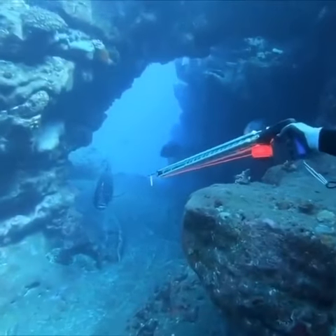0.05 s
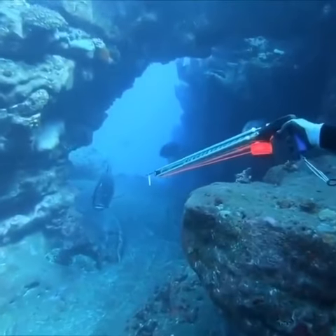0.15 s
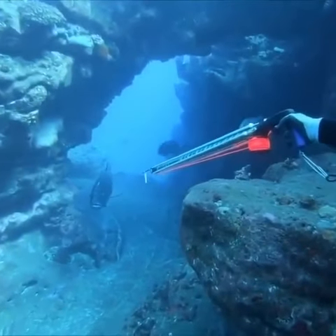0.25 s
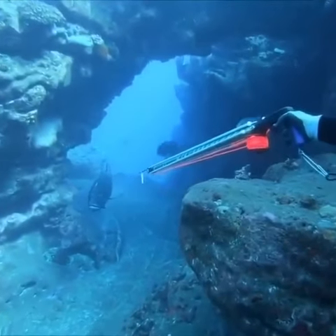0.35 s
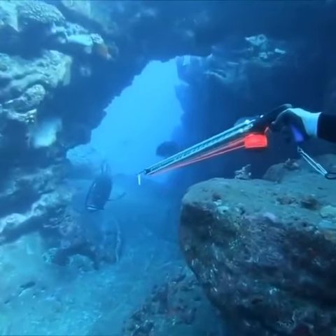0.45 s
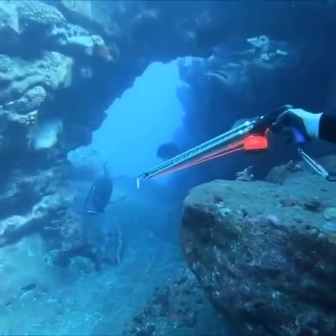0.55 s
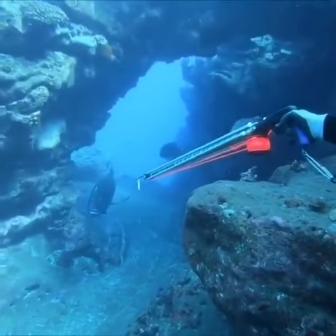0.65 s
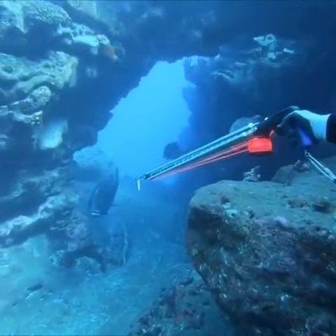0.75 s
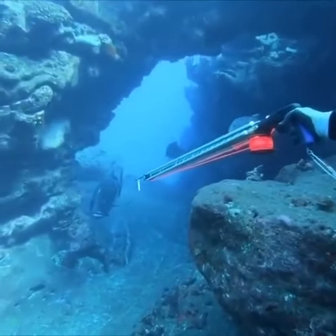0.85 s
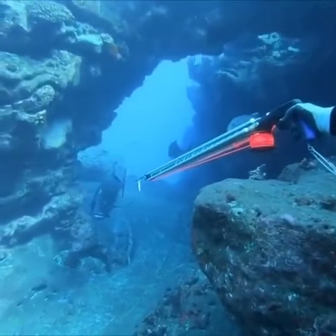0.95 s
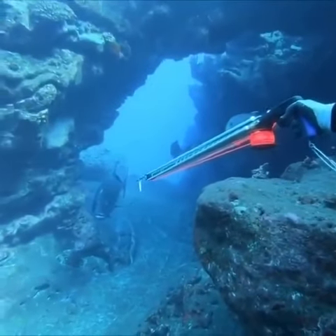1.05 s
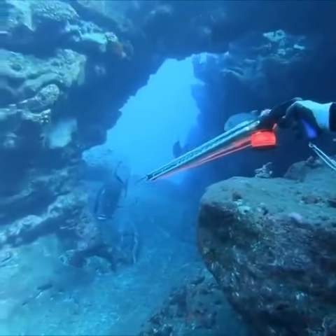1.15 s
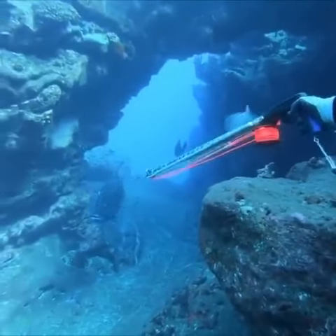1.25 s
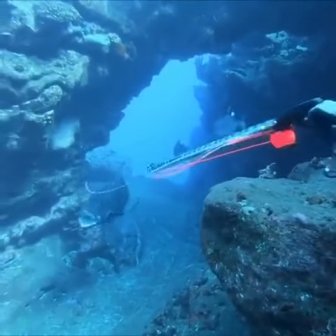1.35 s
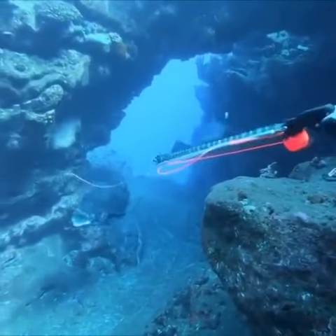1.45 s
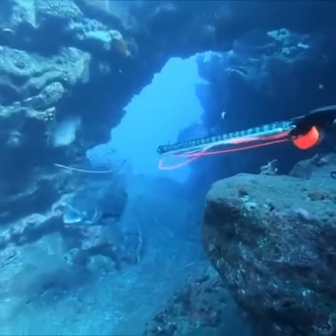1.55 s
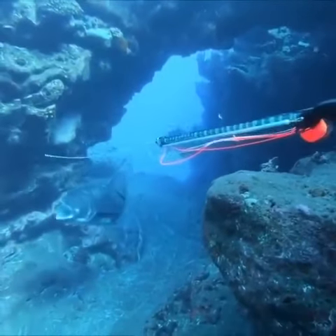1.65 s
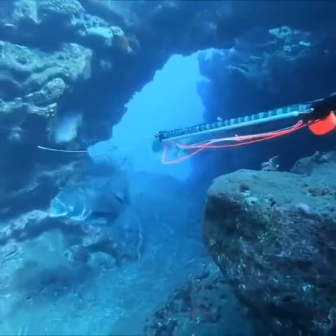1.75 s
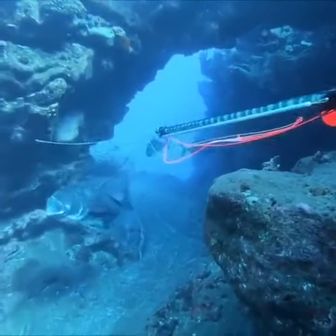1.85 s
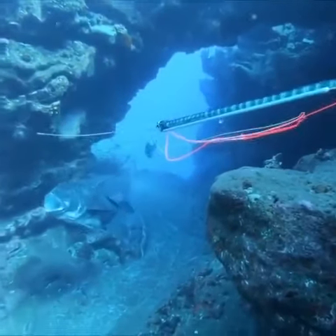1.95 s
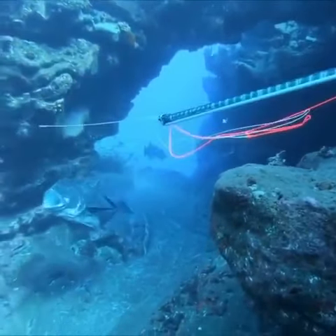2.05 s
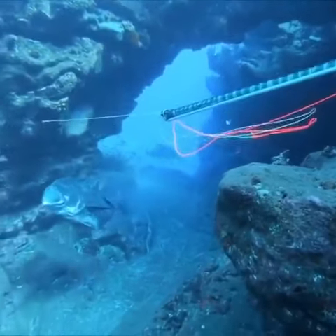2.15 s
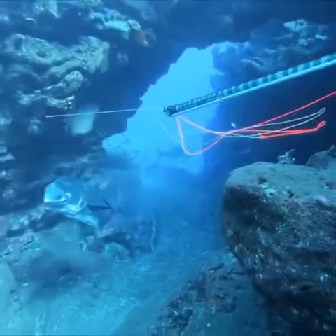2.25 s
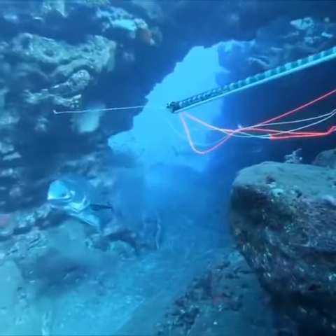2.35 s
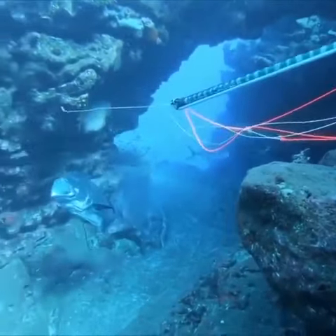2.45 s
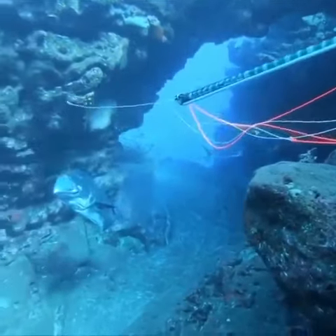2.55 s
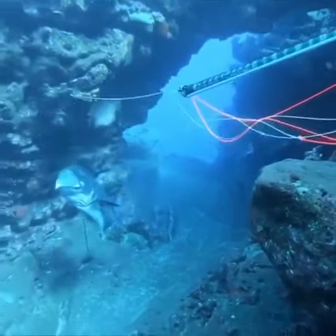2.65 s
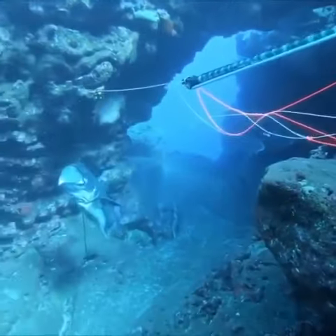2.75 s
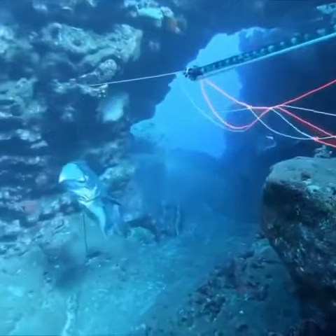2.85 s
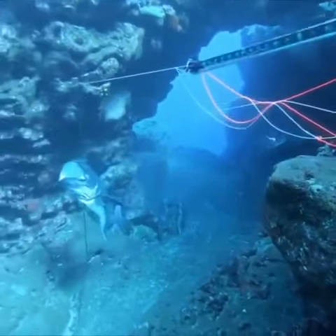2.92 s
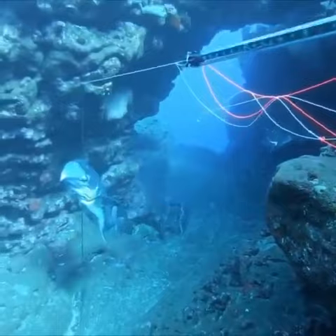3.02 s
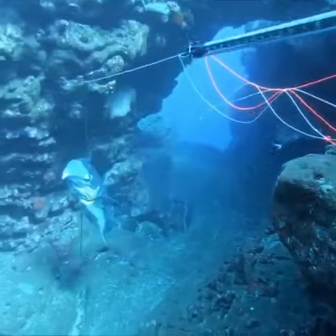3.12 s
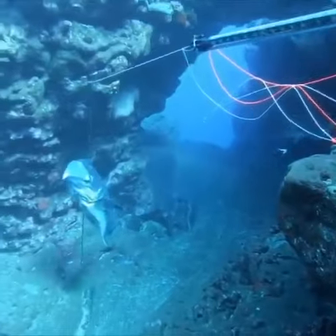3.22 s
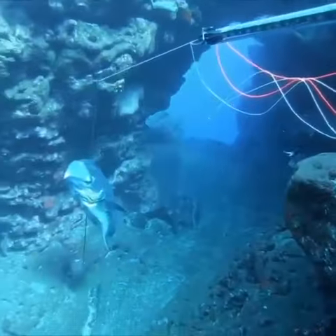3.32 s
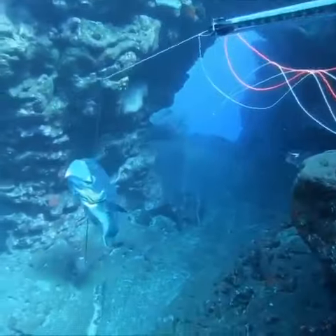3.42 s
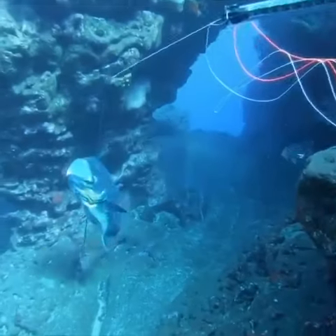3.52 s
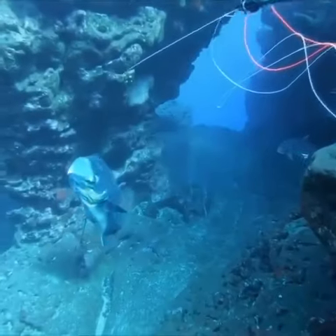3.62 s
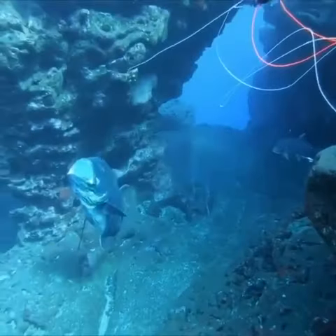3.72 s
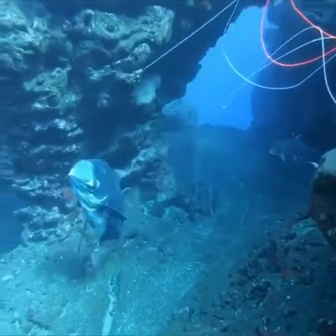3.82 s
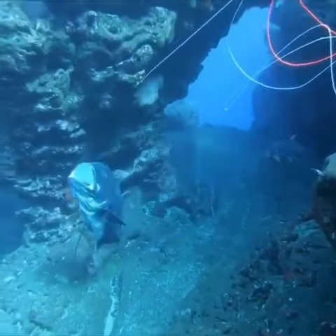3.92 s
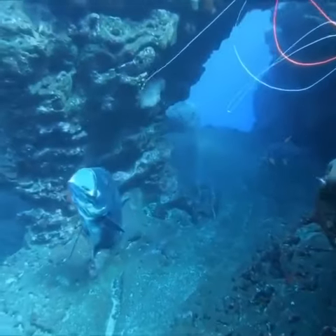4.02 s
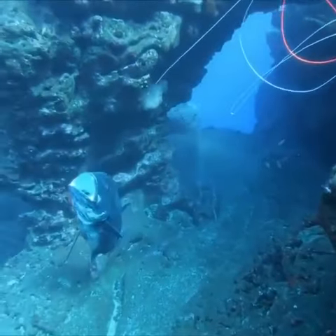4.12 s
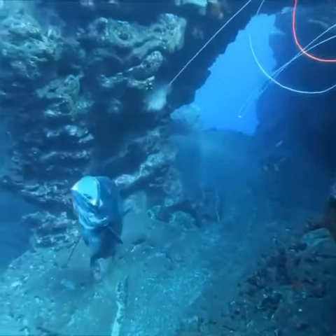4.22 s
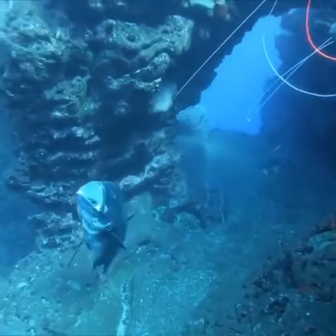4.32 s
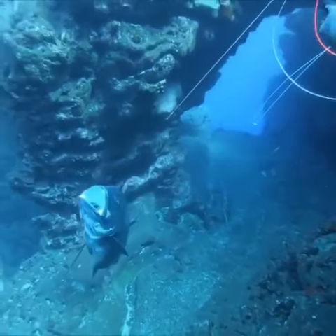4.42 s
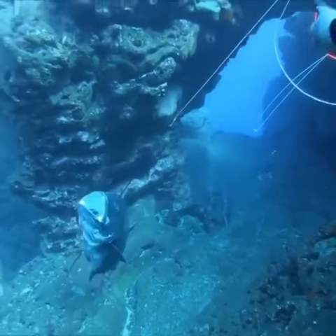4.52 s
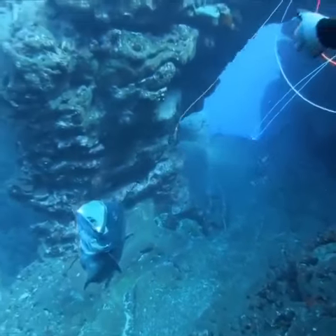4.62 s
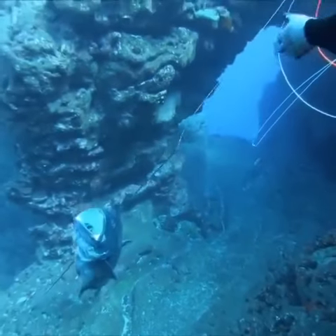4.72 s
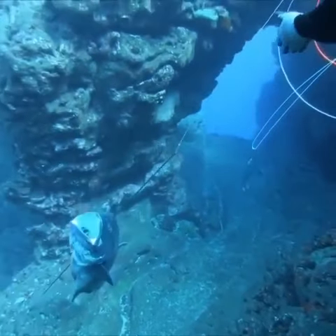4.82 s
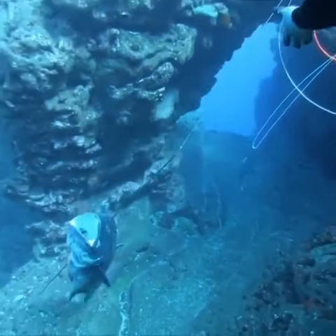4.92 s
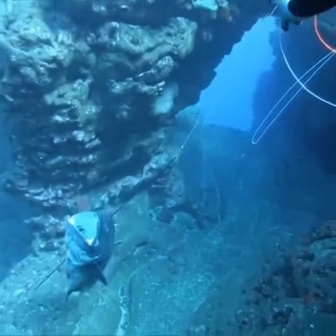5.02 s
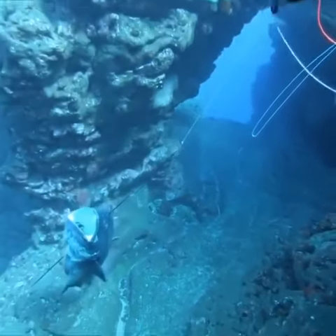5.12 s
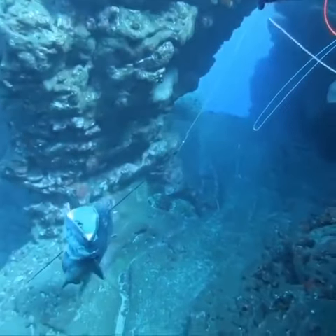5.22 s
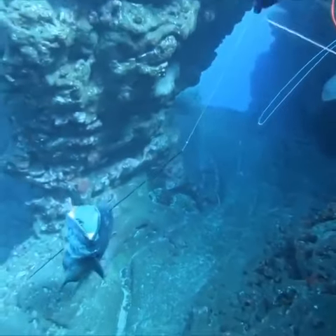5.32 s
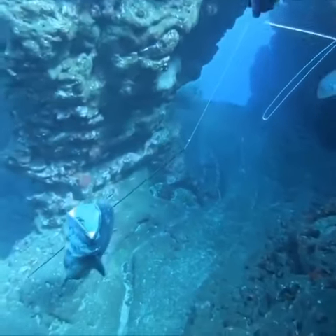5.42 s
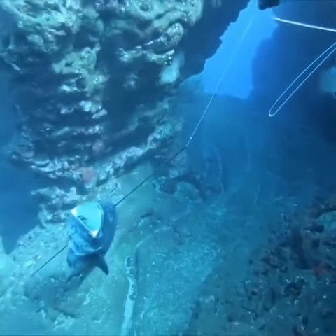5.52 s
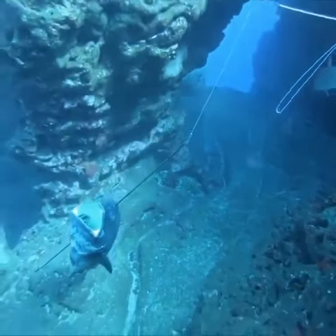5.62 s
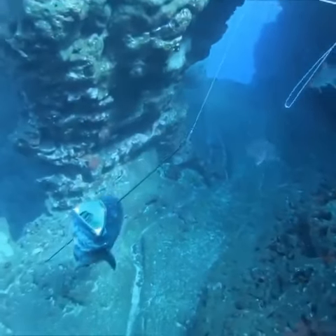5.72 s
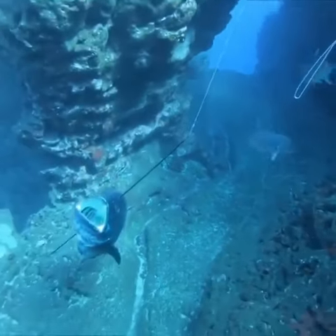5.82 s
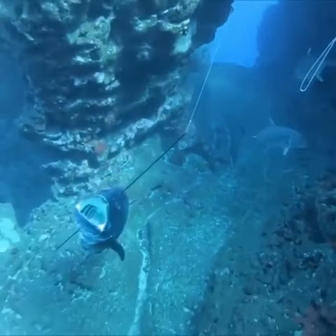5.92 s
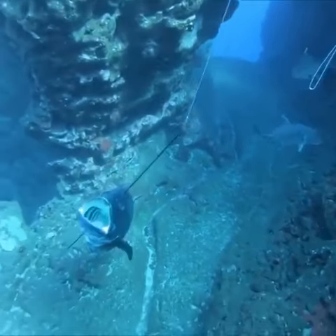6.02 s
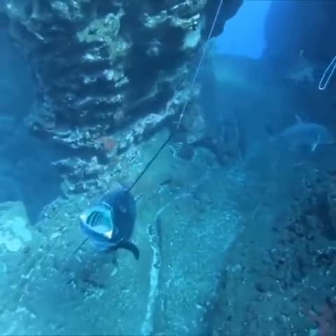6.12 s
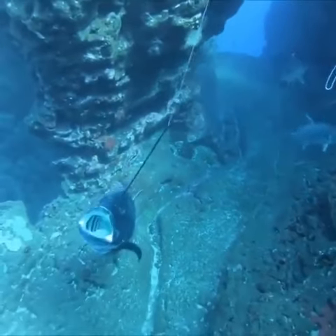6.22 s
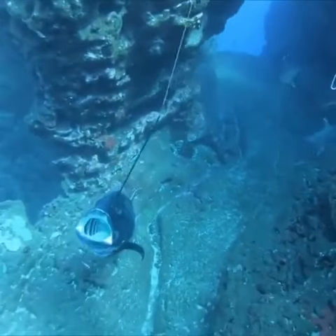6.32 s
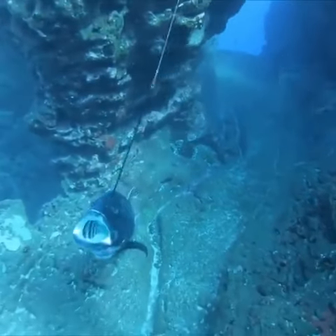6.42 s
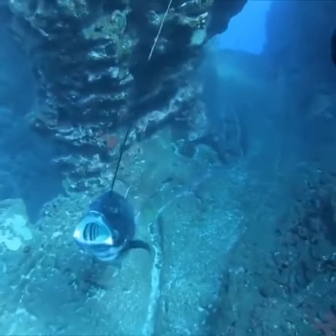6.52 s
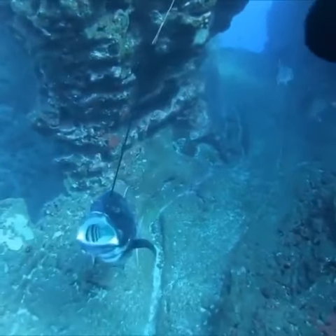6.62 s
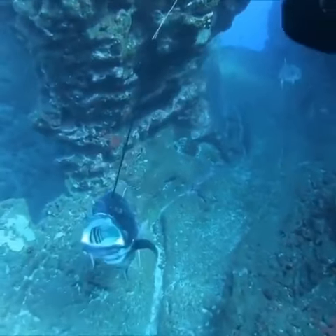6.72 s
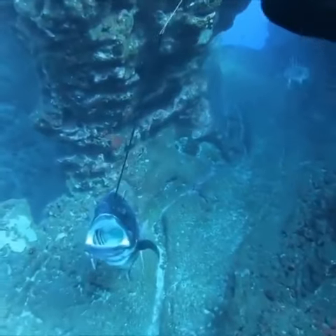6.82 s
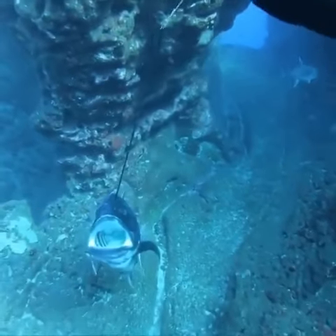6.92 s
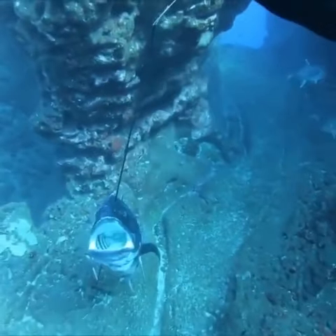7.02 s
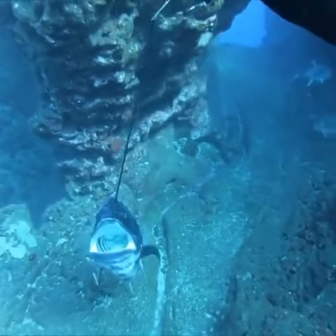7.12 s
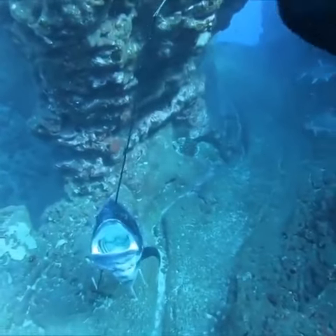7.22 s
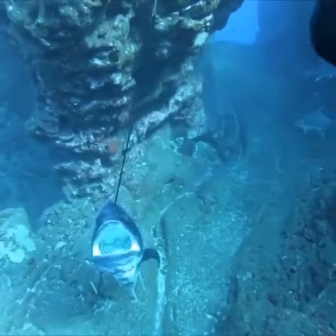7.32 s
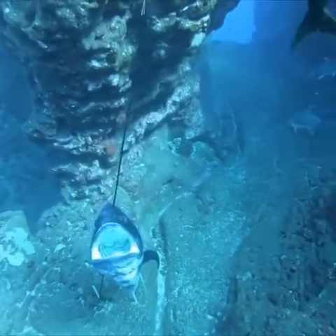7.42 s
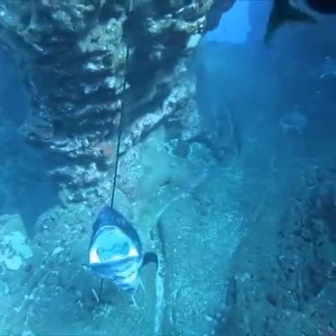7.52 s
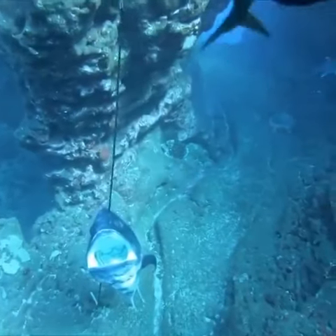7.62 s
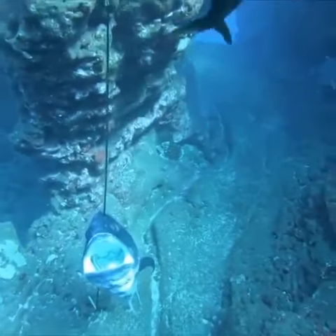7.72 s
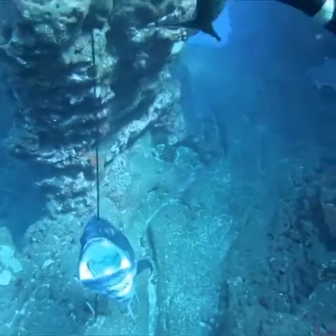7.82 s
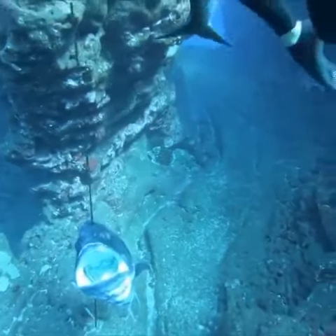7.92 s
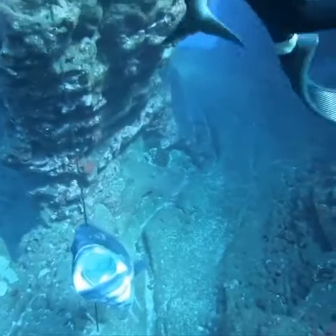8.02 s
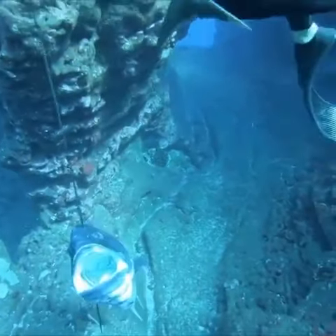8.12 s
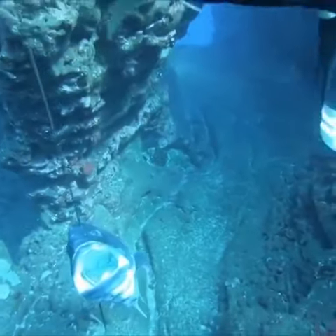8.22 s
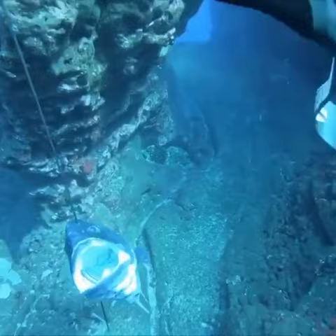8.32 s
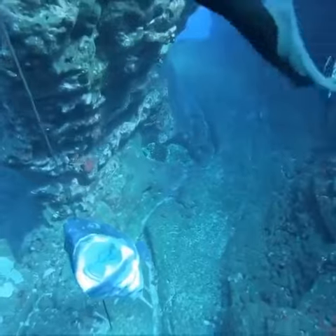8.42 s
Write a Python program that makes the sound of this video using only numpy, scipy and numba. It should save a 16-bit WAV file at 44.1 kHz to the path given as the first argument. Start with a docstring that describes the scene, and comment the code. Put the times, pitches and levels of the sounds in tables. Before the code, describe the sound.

Underwater, close, through a resonant camera housing: fine crackling and thin hiss, then a sudden speargun shot, trigger crack, accelerating scrape and band slam in a split second. A watery wake dies away. Irregular hollow knocks from the struck fish follow for three seconds, then thin out. Afterwards taut line rubs and swishes, gear bumps, bubbles ring, water hums in surges and nearby shrimp snap brightly.

```python
"""Shrimp crackle and soft thumps of water are heard first, then a speargun fires in a sea cave.
The trigger cracks, the shaft scrapes faster and faster along the rail, and the bands slam home in filtered impacts.
A wake of noise dies away while gain control ducks the sound and creeps back; the speared fish croaks in short pulses.
Random clicks through resonances make the rubbing line, stirred water and shrimp; damped swings make bubbles,
thumps and bouts of fish drumming. A camera's watertight housing colours most of the sounds."""
import sys
import numpy as np
from scipy import signal
from scipy.fft import rfft, irfft
from scipy.io import wavfile
from scipy.ndimage import uniform_filter1d, minimum_filter1d
from numba import njit

SR = 44100
rng = np.random.default_rng(int(sys.argv[2]) if len(sys.argv) > 2 else 0)


def put_to_file(sound):
    """Save the sound as 16-bit audio at rate SR, in the file named by the first command-line argument."""
    columns = np.atleast_2d(sound).T  # one column per channel
    safe = np.clip(columns, -1, 1)
    whole_steps = np.round(safe * 32767)
    wavfile.write(sys.argv[1], SR, whole_steps.astype(np.int16))


N = 373086
T = np.arange(N) / SR
EXIT_S = 1.338  # the moment the shaft leaves the rail

# Peaks and dips of the housing wall. Each row: frequency in Hz, width in Hz, lift in dB.
HOUSING = [(404, 140, -3.5), (766, 112, 4.5), (937, 80, 6), (1146, 92, -14.5), (1390, 1270, 3),
           (1866, 67, -11.5), (2776, 590, 2.5), (4666, 225, 5), (4920, 280, -2.5), (5983, 850, 9.5),
           (10100, 180, 1.5), (11210, 435, -11.5)]


def undb(db):
    """Turn decibels into a gain."""
    return 10 ** (np.asarray(db) / 20)


def unit(x):
    """Scale a sound to an rms level of 1."""
    return x / np.sqrt(np.mean(x ** 2))


def fader(rows):
    """Draw a gain over time through points of (seconds, dB)."""
    return undb(np.interp(T, *np.transpose(rows)))


def add(out, s, x):
    """Mix a short sound in, starting at s seconds."""
    i = max(int(s * SR), 0)
    out[i:i + len(x)] += x[:max(N - i, 0)]


def decay(t, t60):
    """Fade by 60 dB in every t60 seconds."""
    return np.exp(-np.log(1000) * t / t60)


def response(colour, modes=(), tilt_db=0, size=4096):
    """Make the impulse response of a smooth colour with peaks, dips and a tilt in dB per octave."""
    f = np.maximum(np.fft.rfftfreq(size, 1 / SR), 1)
    hz, db = np.transpose(colour)
    db = np.interp(np.log(f), np.log(hz), db)
    db = db + tilt_db * np.log2(np.clip(f, 600, 8000) / 1000)
    for centre, width, lift in modes:
        db = db + lift * np.exp(-((f - centre) / width) ** 2)
    # folding the cepstrum gives minimum phase: the energy comes as early as it can
    cepstrum = irfft(db * np.log(10) / 20)
    cepstrum[1:size // 2] *= 2
    cepstrum[size // 2 + 1:] = 0
    return irfft(np.exp(rfft(cepstrum)))


def through(x, ring):
    """Pass a sound through an impulse response and keep its length."""
    return signal.fftconvolve(x, ring)[:len(x)]


def scatter(t60, size=8192):
    """Make a dying cloud of reflections with energy 1, from noise that builds up and decays."""
    t = T[:size]
    build_up = 1 - np.exp(-t / 0.0011)
    x = rng.standard_normal(size) * decay(t, max(t60, 1 / SR)) * build_up
    return x / np.linalg.norm(x)


def strike(ring, db, t60, tail_db):
    """Make one impact: a direct hit that peaks at db, and its scattered tail."""
    push = undb(tail_db) * scatter(t60)
    push[0] += 1  # the direct hit
    return through(push, ring) * undb(db) / np.abs(ring).max()


def throb(hz, db, t60, rise, sag=0, size=16384):
    """Make a damped swing that can start sharp and sag, or with a negative sag start flat and climb."""
    t = T[:size]
    pitch = hz * (1 + sag * np.exp(-t / 0.0082))
    phase = 2 * np.pi * np.cumsum(pitch) / SR
    swing = (1 - np.exp(-(t / rise) ** 2)) * decay(t, t60)
    return undb(db) * swing / swing.max() * np.sin(phase)


def walk(rate, size=N):
    """Wander smoothly at random around 0, with a spread of roughly 1 and about rate changes per second."""
    k = int(SR / rate)
    steps = np.repeat(rng.standard_normal(size // k + 1), k)
    return 1.3 * uniform_filter1d(uniform_filter1d(steps, k), k)[:size]


def grains(rate, spread_db, most_db):
    """Make random clicks, rate per second, many small and a few large."""
    chance, size = rng.random(N), rng.exponential(size=N)
    force = undb(np.minimum(spread_db * size, most_db))
    return unit((chance < rate / SR) * force * rng.choice([-1, 1], N))


def speargun():
    """Trigger, rattling shaft and bands ring one gun; its steel sings on and its low recoil modes thump."""
    # Blows in the gun. Each row: start in seconds, level in dB, treble tilt in dB per octave,
    # decay time of the scattered tail in seconds.
    blows = [(1.2744, -22, 1.5, .03), (1.2789, -0.5, 5, 0.016), (1.2807, 0.5, 7.5, 0.018),
             (1.3221, -8, 1, .03), (1.3314, 6.5, -4, 0.024), (1.3352, -8.5, -2, .015),
             (1.3421, 7.5, -5.5, 0.0096), (1.3439, 14.5, -1, 0.015), (1.3466, -1, -3, 0.013),
             (1.3685, -3.5, -1, 0.027), (1.3929, -11.5, -1.5, 0.029)]
    # Peaks and dips of the barrel. Each row: frequency in Hz, width in Hz, lift in dB.
    gun_modes = [(880, 81, 7), (1184, 73, -16), (1450, 160, 5), (2120, 80, 3.5), (3540, 90, 2),
                 (4100, 350, 9), (5530, 250, 1), (7040, 110, 9), (7960, 110, 8.5), (9600, 71, 0.5)]
    # Free ring of the steel shaft. Each row: frequency in Hz, level in dB.
    shaft_modes = [(1343, -3), (1392, -15), (1469, -8), (1563, 9), (1653, 1), (2029, -7), (2107, -8),
                   (2383, -17), (2639, -2)]
    # Low modes of the recoiling gun and its whipping bands. Each row: frequency in Hz, level in dB,
    # decay time in seconds.
    recoil = [(210.6, -0.5, 0.13), (121.6, -1.5, 0.15), (69, 4.5, 0.14)]
    # Kicks of the gun at release, slam and rebound. Each row: time in seconds, level in dB added to each mode,
    # tilt in dB per octave about 100 Hz.
    kicks = [(1.255, -31.5, -20.5), (1.332, 1.5, 0.5), (1.424, -21.5, -5)]
    # Colours of the blows and of the scraping shaft. Each row: frequency in Hz, level in dB.
    gun_colour = [(100, -50), (450, -17), (800, -2), (1500, 7.5), (2600, 1.5), (4000, -16.5), (7000, -29),
                  (10500, -18), (13000, -60)]
    scrape_colour = [(100, -9), (700, -14), (1100, -13), (1600, 6.5), (2700, -0.5), (4200, -28),
                     (5400, -16.5), (6500, -28), (10500, -19.5), (13000, -41)]
    release_s = 1.264  # the shaft is let go
    scrape_db, scrape_power = -7.5, 2.6  # the scrape grows as a power of the speed
    # each recoil mode starts late and builds up over a share of its own cycle, so the lows come last
    lag_cycles, rise_cycles = 2.04, 0.53

    modes = HOUSING + gun_modes
    rattle = undb(4 * walk(rate=330))
    chatter = grains(rate=2200, spread_db=3, most_db=13) * rattle
    # the shaft gains speed steadily until it leaves the rail
    speed = np.clip((T - release_s) / (EXIT_S - release_s), 0, 1) * (T <= EXIT_S)
    scrape_gain = undb(scrape_db) * speed ** scrape_power
    empty_gun_gain = after_shot(-18, 0.22)
    out = unit(through(chatter, response(scrape_colour, modes))) * (scrape_gain + empty_gun_gain)

    steel = ringing(shaft_modes, t60=0.16)
    for s, db, tilt_db, t60 in blows:
        blow = strike(response(gun_colour, modes, tilt_db), db, t60, tail_db=-3.5)
        add(out, s, blow + steel * undb(db - 46))
    for s, kick_db, tilt_db in kicks:
        for hz, db, t60 in recoil:
            peak_db = kick_db + db + tilt_db * np.log2(hz / 100)
            add(out, s + lag_cycles / hz, throb(hz, peak_db, t60, rise_cycles / hz))
    return out


def after_shot(db, t60):
    """Make a gain that jumps up as the shaft leaves the rail, then dies away."""
    age = np.maximum(T - EXIT_S, 0)
    return undb(db) * (age > 0) * decay(age, t60)


def ringing(modes, t60, size=8192):
    """Let a set of modes ring freely as sines that die away together."""
    t = T[:size]
    return sum(undb(db) * np.sin(2 * np.pi * hz * t) for hz, db in modes) * decay(t, t60)


def fish():
    """Croaks come as two softer pulses, a peak and a rebound; low beats drum on the swim bladder."""
    # Croaks. Each row: time of the main pulse in seconds, level in dB,
    # hardness as lift of the upper resonance in dB, rebound level in dB relative to the main pulse.
    knocks = [(1.936, -15, 1.5, -2), (2.249, -12.5, 2, -5), (2.5112, -14, 7.5, -1),
              (2.5474, -14.5, 0.5, -8.5), (2.6435, -31.5, 1.5, -15), (2.72, -11, 6, -4),
              (2.7424, -14.5, -0.5, -5), (2.917, -14, -0.5, -4), (3.0478, -12, 6, 0),
              (3.1614, -14, 0.5, -7), (3.3163, -14, 7.5, -4.5), (3.331, -17, -0.5, -2.5),
              (3.5298, -14.5, 2, -6), (3.73, -17, -1, -5.5), (3.7681, -14, 6.5, -6),
              (3.8950, -13.5, 4, -17), (4.1429, -17, 0.5, -6), (4.2636, -16, 7, -6.5),
              (4.5855, -21, -1, -6), (4.884, -21, 0.5, -4)]
    # Bouts of low drumming. Each row: first beat in seconds, number of beats, gap between beats in seconds,
    # middle level in dB.
    bouts = [(5.047, 3, 0.083, -47.5), (5.308, 3, 0.045, -44.5), (5.456, 4, 0.055, -42),
             (5.711, 4, 0.078, -43.5), (6.226, 3, 0.058, -43), (7.619, 3, 0.058, -44),
             (8.112, 4, 0.07, -47)]
    bladder_hz = 215.5  # middle pitch of the drumming

    out = np.zeros(N)
    for s, db, hard_db, rebound_db in knocks:
        # a harder croak has a shorter lead-in and a later rebound, both in seconds
        lead = 0.00458 * np.exp(-0.038 * hard_db)
        rebound = 0.0057 * np.exp(0.075 * hard_db)
        lead_db = db - 7.5 - 0.6 * hard_db  # the harder the croak, the weaker its lead-in
        add(out, s - 2 * lead, croak(lead_db - 11.0, hard_db - 1.5))
        add(out, s - lead, croak(lead_db, hard_db - 4))
        add(out, s, croak(db, hard_db))
        add(out, s + rebound, croak(db + rebound_db, hard_db - 0.5))
    for start, beats, gap, db in bouts:
        for k, (force, tension) in enumerate(rng.standard_normal((round(beats), 2))):
            hz = bladder_hz * np.exp(0.03 * tension)
            add(out, start + k * gap, throb(hz, db + force, t60=0.065, rise=0.0065, sag=0.12))
    return out


def croak(db, hard_db):
    """Make one woody pulse with a short echo off the rock: the harder, the stronger its upper resonance."""
    # Colour of the croak. Each row: frequency in Hz, level in dB.
    croak_colour = [(60, -39), (150, -21), (220, -4), (330, -26), (500, -19), (720, 0), (950, -0.5),
                    (1550, -2.5), (2400, -17.5), (3300, -39), (6000, -62), (12000, -83)]
    upper = (1580, 360, hard_db)  # upper resonance: Hz, width in Hz, lift in dB
    # random accents, so no two pulses ring quite alike
    centres = np.geomspace(700, 2400, 7) * rng.uniform(.94, 1.06, 7)
    accents = [(hz, hz / 12, 2.4 * rng.standard_normal()) for hz in centres]
    ring = response(croak_colour, HOUSING + [upper] + accents, tilt_db=0.69 * hard_db)
    return strike(ring, db, t60=.06, tail_db=-10)


def rubbing(count=22):
    """Line and gear stir up brief bubbly rings of many sizes; now and then the line drags and sings."""
    # How hard the diver moves, shifting a little while aiming, then hauling in the fish.
    # Each row: time in seconds, effort in dB.
    effort = [(0, -9), (.4, -9), (.5, 3.5), (.64, -11), (.95, -19), (1.25, -12.5), (1.9, -1.5), (2.9, 3.5),
              (4.3, 2.5), (4.9, -3), (5.4, 2.5), (6.6, 4.5), (7.15, -1), (7.7, 1.5), (8.46, -4.5)]
    # Swishes of line and gear through the water. Each row: middle in seconds, half length in seconds,
    # level in dB before the fade in and out, main frequency in Hz.
    swishes = [(1.56, 0.051, -36, 795), (1.609, 0.031, -39, 934), (2.395, 0.014, -38, 970),
               (2.993, 0.035, -41, 1680), (4.309, 0.017, -39.5, 1850), (4.923, 0.029, -43, 1110),
               (5.37, 0.043, -42, 980), (5.423, 0.1, -44.5, 1660), (5.462, 0.036, -45, 1470),
               (5.614, 0.017, -46, 1000), (5.646, 0.018, -43, 1080), (5.769, 0.04, -44.5, 2070),
               (5.927, 0.09, -50, 1970), (6.489, 0.041, -38, 1790), (6.566, .05, -42.5, 960),
               (6.579, 0.069, -39, 1710), (6.724, 0.17, -47.5, 2000), (7.39, 0.039, -45, 1640)]
    # Resonances of the taut line and the gun it drags on. Each row: frequency in Hz, width in Hz, lift in dB.
    line_modes = [(956, 51, 9), (1475, 70, 1.5), (1744, 48, 8.5), (2125, 84, 5.5), (2610, 110, 4)]
    # Colour of the rubbing. Each row: frequency in Hz, level in dB.
    rub_colour = [(100, -19), (350, -16.5), (550, -7.5), (800, 3), (1500, 2), (2400, -2.5), (3500, -11),
                  (6000, -27), (12000, -51)]

    bubbles = np.zeros(N)
    t = T[:SR // 20]
    for hz in np.geomspace(480, 3400, count):
        bubble = np.sin(2 * np.pi * hz * t) * np.exp(-hz * t / 3)
        stream = unit(through(grains(rate=100, spread_db=3.0, most_db=7.0), bubble))
        bubbles += stream * np.sqrt(hz) * undb(6.3 * walk(rate=14))
    wake_fizz = after_shot(-41, 2.15)
    rub_gain = undb(-56) * fader(effort) ** 0.93 + wake_fizz
    fits_and_starts = undb(4 * walk(rate=22))
    out = unit(through(bubbles, response(rub_colour, HOUSING)) * fits_and_starts) * rub_gain

    for s, half_length, db, hz in swishes:
        size = int(2 * half_length * SR)
        slips = rng.standard_normal(size) * (rng.random(size) < .04) * undb(4 * walk(260, size))
        colour = [(hz / 4, -28), (hz, 0), (hz * 1.45, -4), (hz * 3, -35)]
        swish = through(slips, response(colour, HOUSING + line_modes))
        add(out, s - half_length, unit(swish) * np.hanning(size) * undb(db))
    return out


def handling():
    """Single bubbles ring and rise in pitch; gear bumps dully against the housing."""
    # Single bubbles. Each row: start in seconds, level in dB, final frequency in Hz.
    bubbles = [(2.957, -33, 1440), (6.025, -41, 849), (6.84, -37, 2130), (6.871, -32, 2190),
               (7.046, -41, 860)]
    # Dull bumps of gear. Each row: start in seconds, level in dB, main frequency in Hz.
    bumps = [(5.532, -33, 660), (5.545, -28, 1120), (6.889, -38.5, 1060), (7.212, -42, 890)]
    rise_cycles, t60_cycles = 5.2, 31  # rise and decay of a bubble, in its own cycles

    out = np.zeros(N)
    for s, db, hz in bubbles:
        add(out, s, throb(hz, db, t60_cycles / hz, rise_cycles / hz, sag=-0.034))
    for s, db, hz in bumps:
        colour = [(hz / 6, -12), (hz / 2, -3), (hz, 0), (hz * 2, -9), (hz * 5, -34)]
        add(out, s, strike(response(colour, HOUSING), db, t60=0.027, tail_db=1.5))
    return out


def water():
    """Moving water hums in the housing and presses on it in slow surges, thumps and glugs."""
    # Flow of water past the housing. Each row: time in seconds, flow in dB.
    flow = [(0, -28), (.4, -24), (.5, -7.5), (.64, -23), (1.25, -15), (1.9, -2.5), (2.9, 5), (3.5, -1),
            (4.4, -1.5), (4.9, -6), (5.5, 5), (5.9, -9), (6.12, 3.5), (6.4, -1.5), (6.9, -5), (7.3, 4),
            (7.85, 1.5), (8.46, -7)]
    # Soft thumps of water and gear against the housing. Each row: start in seconds, level in dB, frequency in Hz.
    shoves = [(0.447, -49.5, 163), (0.502, -46, 167), (0.87, -44.5, 155), (0.92, -43, 151),
              (0.974, -49, 160), (1.067, -45.5, 160), (1.196, -45.5, 169), (2.792, -38, 162),
              (3.573, -44.5, 86.5), (5.204, -46, 56), (5.267, -41.5, 149), (6.43, -39, 163),
              (6.469, -52, 57), (7.179, -47, 46), (7.477, -39, 159), (7.611, -39, 136), (7.849, -41, 157)]
    # Glugs of water that fall in pitch. Each row: start in seconds, level in dB, starting frequency in Hz.
    glugs = [(5.39, -52, 141), (6.006, -58, 170), (7.51, -48, 146)]
    # Colours of the hum and of the surges. Each row: frequency in Hz, level in dB.
    hum_colour = [(40, -28), (110, -14.5), (155, 6.5), (215, -3.5), (280, -10.5), (400, -27.5), (1000, -66)]
    surge_colour = [(10, -32), (30, -3), (70, -6), (120, -22), (200, -8.5), (600, -69)]
    rise_cycles, t60_cycles = 1, 14.3  # rise and decay of a thump, in its own cycles
    wake_t60 = 0.42  # seconds

    hum = unit(through(grains(rate=110, spread_db=3, most_db=8), response(hum_colour)))
    eddies = undb(4 * walk(rate=12))
    hum = unit(hum * eddies)
    surge = through(rng.standard_normal(N), response(surge_colour))
    surge = unit(surge * undb(4 * walk(rate=8)))
    stir = undb(-54.5) * fader(flow)
    out = hum * (stir + after_shot(-15, wake_t60))
    out += surge * (stir * undb(-20.5) + undb(-70.0) + after_shot(-20.5, wake_t60))
    for s, db, hz in shoves:
        add(out, s, throb(hz, db, t60_cycles / hz, rise_cycles / hz))
    for s, db, hz in glugs:
        add(out, s, glug(hz, db))
    return out


def glug(hz, db, size=8192):
    """Make a low swing that swells and slides down in pitch."""
    rise_s, t60_s, octaves_per_s = 0.024, 0.29, 14.4
    t = T[:size]
    swing = (1 - np.exp(-(t / rise_s) ** 2)) * decay(t, t60_s)
    pitch = hz * 2 ** (-octaves_per_s * t)
    return undb(db) * swing / swing.max() * np.sin(2 * np.pi * np.cumsum(pitch) / SR)


def shrimp(count=12):
    """Noise stands for far snaps merged into hiss; colonies crackle as random clicks; near snaps stand alone."""
    # Sharp snaps nearby. Each row: start in seconds, level in dB, treble tilt in dB per octave.
    snaps = [(0.068, -28.5, 8), (0.103, -29, 4.5), (0.149, -25.5, 2), (0.3051, -25, 10.5),
             (0.553, -27.5, 9), (0.9975, -29, 6), (1.525, -22, -2.5), (2.0956, -18.5, 2), (2.436, -25, 2),
             (3.038, -24, 4), (3.956, -29, 5), (4.3758, -25.5, 2.5), (5.111, -31, 14), (4.9955, -27, 16),
             (5.3382, -28.5, 10.5), (5.877, -34, -1), (6.1484, -25.5, -6.5), (6.165, -29, 9.5),
             (6.3664, -20, 2), (6.6544, -13.5, -1.5), (6.9886, -29, 4), (7.117, -36, 6),
             (7.2942, -30.5, 5.5), (7.426, -15, 0), (7.546, -21.5, -7), (7.786, -25.5, -1.5),
             (8.1792, -19, -2), (8.236, -22.5, 6.5), (8.254, -24, 2)]
    # Colours of a near snap and of the crackle and hiss. Each row: frequency in Hz, level in dB.
    snap_colour = [(100, -73), (500, -16), (900, -2), (1600, 12), (2700, 10), (4000, 0.5), (7000, -13.5),
                   (10500, -16), (13000, -50)]
    shrimp_colour = [(100, -16.5), (500, -19), (900, -5.5), (1500, 3.5), (2400, 4.5), (3600, -3.5),
                     (5000, -7.5), (7500, -5), (10500, -5.5), (12500, -16), (13500, -37)]

    crackle = np.zeros(N)
    for tilt_db in np.linspace(-5, 2.5, count):
        # random accents give each colony its own colour
        centres = np.geomspace(1500, 7000, 5) * rng.uniform(.8, 1.2, 5)
        accents = [(hz, hz / 4, 5 * rng.choice([-1, 1])) for hz in centres]
        path = strike(response(shrimp_colour, HOUSING + accents, tilt_db), 0, t60=0.011, tail_db=0.5)
        colony = through(grains(rate=45, spread_db=4.5, most_db=24.5), path)
        crackle += unit(colony * undb(3 * walk(rate=9.7)))  # the colony swells and fades
    flicker = undb(2.0 * walk(rate=21))
    hiss = through(rng.standard_normal(N) * flicker, response(shrimp_colour, HOUSING))
    out = undb(-55.5) * unit(crackle) + undb(-58.5) * unit(hiss)
    for s, db, tilt_db in snaps:
        accents = [(hz, hz / 6, 2 * rng.standard_normal()) for hz in np.geomspace(1500, 9000, 6)]
        ring = response(snap_colour, HOUSING + accents, tilt_db)
        add(out, s, strike(ring, db, t60=0.029, tail_db=-3.0))
    return out


def scene():
    """Add up all sources; random modulation spreads the treble between left and right."""
    mid = speargun() + fish() + rubbing() + handling() + water() + shrimp()
    treble = signal.sosfilt(signal.butter(10, 4000, "high", fs=SR, output="sos"), mid)
    side = undb(-15) * treble * walk(rate=900)
    return np.array([mid + side, mid - side])


@njit
def hold(over, release):
    """Follow each rise at once, then let go slowly, with release as time constant in seconds."""
    out, held = np.empty(len(over)), 0.
    for i in range(len(over)):
        held = max(over[i], held * (1 - 1 / (release * SR)))
        out[i] = held
    return out


def gain_control(x, ceiling_db, release, size=32):
    """Turn down whatever passes the ceiling and recover over seconds, both channels together."""
    level_db = 20 * np.log10(np.abs(x.mean(axis=0)) + 1e-9)
    over_db = np.maximum(level_db - ceiling_db, 0)
    gain = undb(-hold(over_db, float(release)))
    # spread each dip over a few samples and smooth its edges
    return x * uniform_filter1d(minimum_filter1d(gain, size), size)


def record(dry):
    """The camera ducks after the shot and cuts the treble above 13200 Hz."""
    ducked = gain_control(dry, ceiling_db=-7.5, release=0.94)
    return signal.sosfilt(signal.ellip(8, .2, 70, 13200, fs=SR, output="sos"), ducked)


dry = scene()
out = record(dry)
put_to_file(out)
```